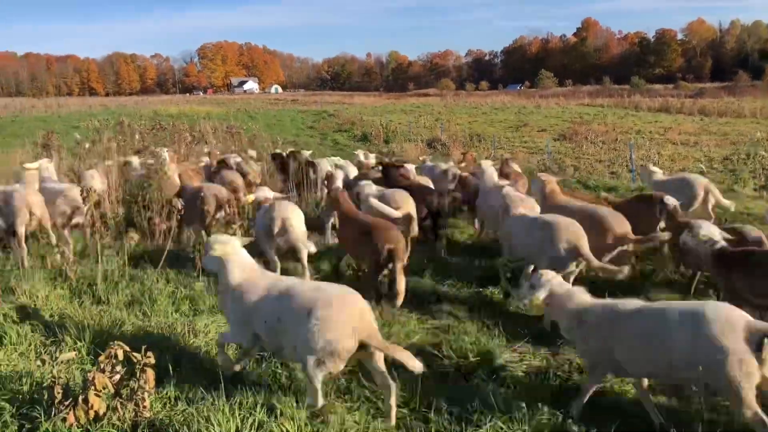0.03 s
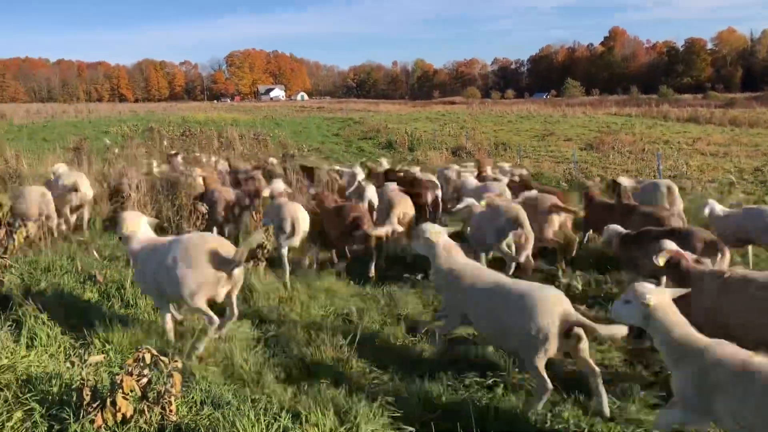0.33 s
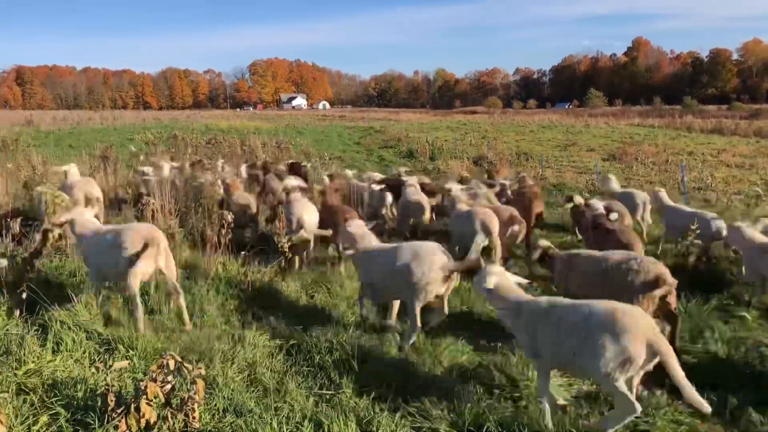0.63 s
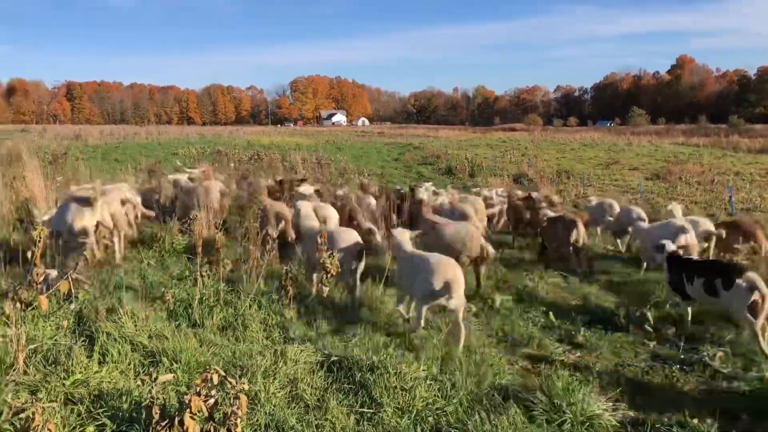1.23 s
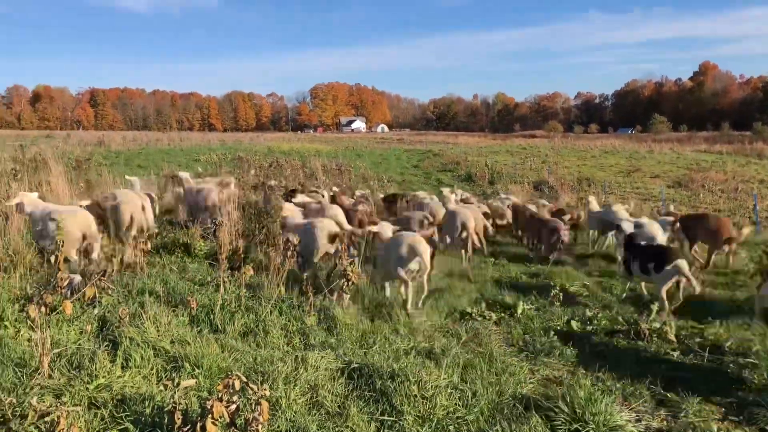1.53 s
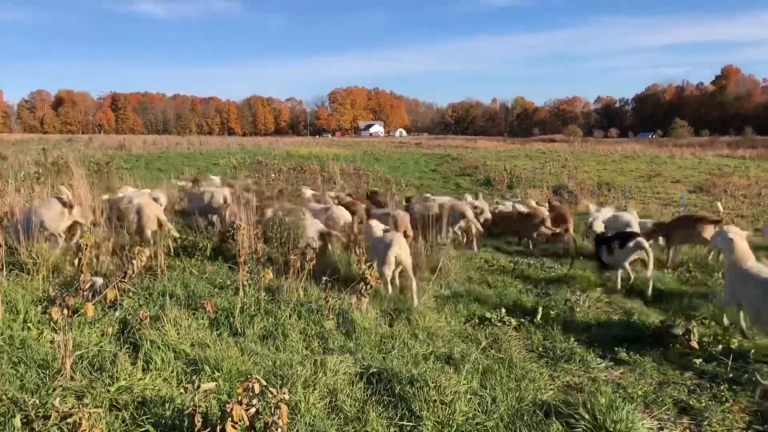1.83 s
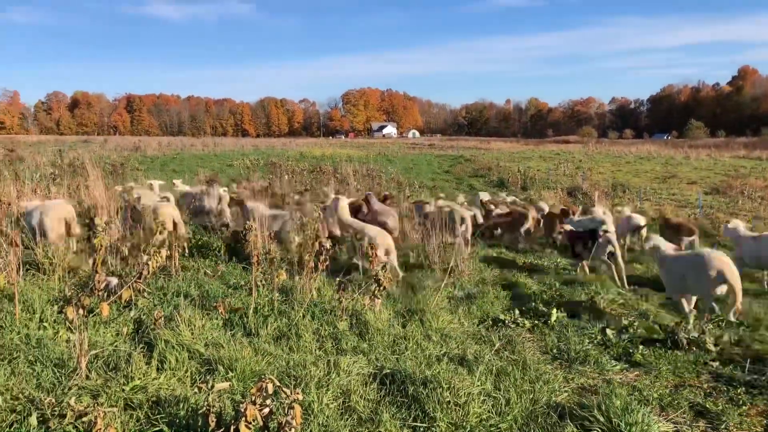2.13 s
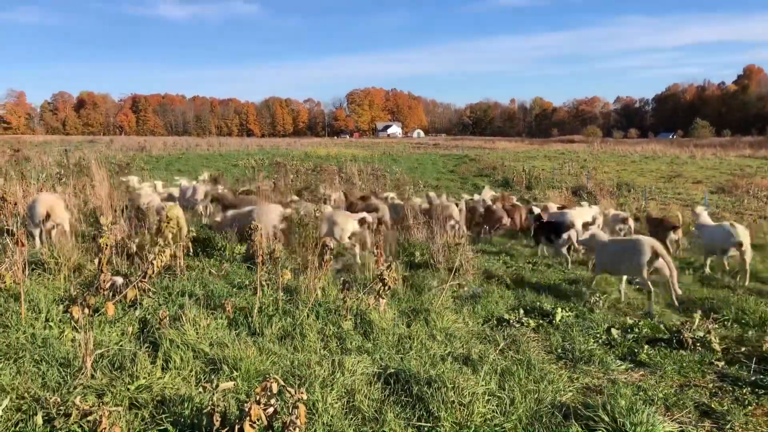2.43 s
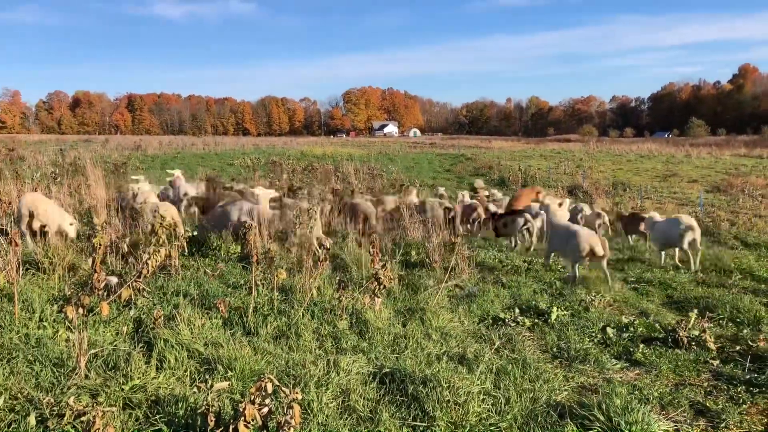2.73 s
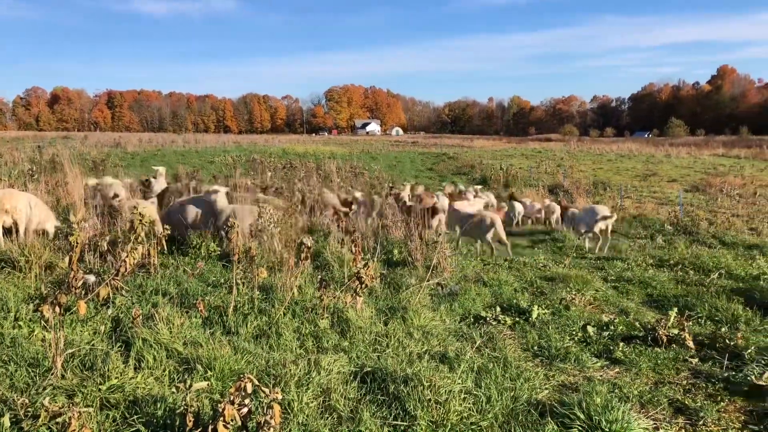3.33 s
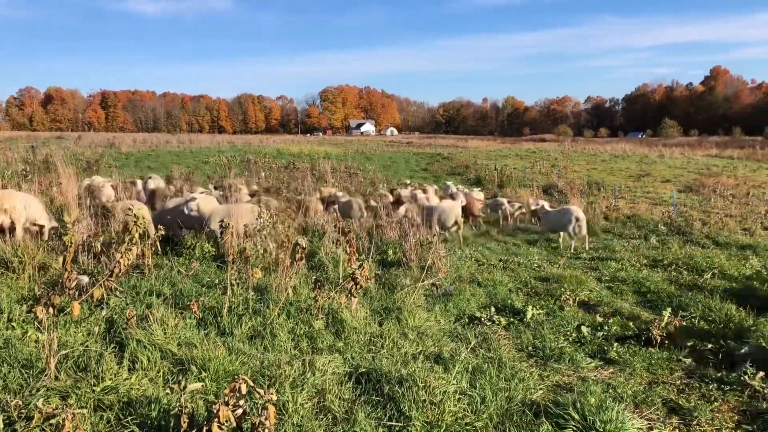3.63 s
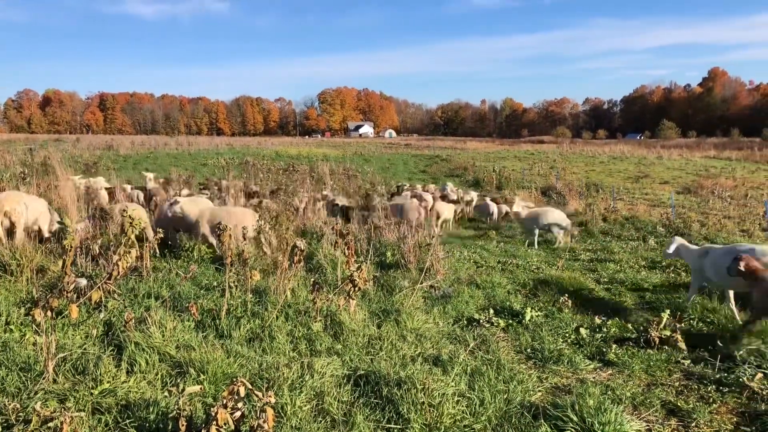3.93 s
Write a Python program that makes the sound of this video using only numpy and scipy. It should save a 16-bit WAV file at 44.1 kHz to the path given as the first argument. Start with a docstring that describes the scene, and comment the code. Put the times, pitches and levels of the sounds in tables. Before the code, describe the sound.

A flock of sheep trots away through grass, its crackling rustle loudest in the first second and fading through 4 seconds. Legs swish through nearby tufts and dry stalks snap, mostly from 0.5 to 2.8 seconds and again around 3.5. Low wind puffs buffet and pop on the microphone, strongest just after 3 seconds. A soft rumble of hooves and a faint hush of open air lie underneath.

```python
"""A flock of sheep trots away through grass and dry weeds, heard on one microphone in open pasture.
Countless blades crackle under the flock, fainter and duller with distance.
Closer in, legs swish through tufts, dry stalks snap and a hoof knocks twice.
Puffs of wind buffet and pop on the microphone; behind it all, a soft rumble of hooves on turf
and the hush of the air."""
import sys
import numpy as np
from scipy import signal
from scipy.fft import rfft, irfft
from scipy.io import wavfile
from scipy.ndimage import uniform_filter1d

SR = 44100
rng = np.random.default_rng(int(sys.argv[2]) if len(sys.argv) > 2 else 0)


def unload_audio(sound):
    """Save the sound as a 16-bit wav file, at the path given as the first command line argument."""
    columns = np.transpose(np.atleast_2d(sound))
    # keep every value between -1 and 1, then stretch to whole-number steps
    steps = np.round(np.clip(columns, -1, 1) * 32767)
    wavfile.write(sys.argv[1], SR, steps.astype(np.int16))


N = 176400
T = np.arange(N) / SR
HZ = np.fft.rfftfreq(N, 1 / SR)

# rustle of the receding flock at the microphone: t/s, level/dB
FLOCK_LEVEL = [(0, -38.5), (.25, -37), (.44, -39), (.53, -35.5), (.64, -40), (.85, -38), (.97, -38),
               (1.04, -39), (1.33, -40.5), (1.5, -39), (1.9, -40.5), (2.08, -40), (2.24, -43.5),
               (2.55, -43), (2.72, -46.5), (3.05, -45), (3.25, -46.5), (3.41, -50), (3.6, -47), (4, -47.5)]
# spectrum of the grass under the flock: f/Hz, relative level/dB
GRASS_SPECTRUM = [(150, 4), (450, -4.5), (750, 0), (1130, -4), (1380, 0.5), (1850, -2), (3000, 1.7),
                  (4600, 2.5), (8000, 2), (12500, 2), (15500, 5)]
# legs through near tufts: peak t/s, rise/s, fall/s, level/dB, share of fine blades/0-1
LEG_SWISHES = [(.135, 0.034, 0.012, -38, 0.95), (.225, 0.016, .018, -37, 0.94),
               (.694, 0.02, 0.03, -38, 0.9), (.767, 0.0033, 0.006, -33.5, 0.4),
               (.791, .0094, 0.033, -34.5, 0.73), (.861, 0.0089, 0.012, -36, 0.6),
               (0.918, 0.0067, 0.011, -36.5, 0.66), (1.157, 0.0053, 0.029, -38.5, 0.5),
               (1.26, 0.0016, .005, -38, 1), (1.429, 0.013, 0.0088, -33.5, 0.62),
               (1.446, 0.0052, 0.0075, -38.5, 0.37), (1.49, 0.043, .014, -47, .9),
               (1.632, .006, 0.02, -53, 0.9), (1.915, .0055, 0.026, -47.5, .1),
               (2.025, 0.01, 0.077, -41, 0.67), (2.14, .018, .018, -44.5, 0.65),
               (2.422, 0.041, 0.057, -43, 0.53), (2.64, 0.013, 0.022, -47, 0.9),
               (3.255, .035, 0.061, -48.5, 0.7), (3.326, 0.022, .015, -39, .76),
               (3.465, 0.005, .03, -39.5, 0.6), (3.491, 0.013, 0.046, -39, .7)]
# spectrum of a tuft's coarse stems: f/Hz, relative level/dB
STEM_SPECTRUM = [(200, -24), (600, 2), (1000, 2), (1450, 5), (2300, 6), (4200, 10.5), (6500, 9.5),
                 (10000, -21), (15500, -14)]
# spectrum of a tuft's fine blades: f/Hz, relative level/dB
BLADE_SPECTRUM = [(300, -1), (2000, -13.5), (4000, -5.5), (6500, 1), (11000, 3.5), (15500, 1.5)]
# dry stalks cracking, and two lower hoof knocks (2.432 and 3.474 s): t/s, level/dB, centre f/Hz
SNAPS_AND_KNOCKS = [(.5058, -33, 10000), (0.688, -40, 2800), (.769, -39, 2200), (.788, -33, 5000),
                    (.909, -35, 4000), (1.158, -32.5, 5500), (1.258, -32, 5650), (1.2598, -30, 8500),
                    (1.428, -35, 4200), (1.444, -30, 3500), (1.511, -26.5, 12000), (1.6309, -29, 12000),
                    (1.6896, -34.5, 6450), (1.911, -36.5, 3900), (1.9316, -42, 7500), (2.14, -36, 3950),
                    (2.4166, -33.5, 4140), (2.432, -45.5, 1260), (2.456, -34, 10200), (2.6328, -33, 6160),
                    (2.6585, -35, 10000), (2.771, -38, 6500), (2.778, -38, 5300), (3.302, -38, 4430),
                    (3.375, -38, 6800), (3.46, -34.5, 6050), (3.474, -40, 2000), (3.4885, -27.5, 6470),
                    (3.55, -35.5, 11300)]
# wind on the microphone: peak t/s, rise/s, fall/s, level/dB, upper edge f/Hz
WIND_PUFFS = [(0.029, 0.035, 0.015, -36.5, 318), (0.152, 0.0076, 0.014, -32, 290),
              (.223, 0.016, 0.023, -35, 218), (1.494, 0.014, 0.029, -32, 165),
              (1.596, 0.026, 0.026, -32.5, 266), (1.735, 0.027, 0.0099, -29, 191),
              (1.788, 0.016, 0.013, -26, 240), (2.051, 0.0067, 0.016, -34.5, 222),
              (2.089, 0.0068, .018, -29.5, 385), (2.154, 0.042, 0.06, -32.5, 135),
              (2.43, 0.033, 0.033, -38, 128), (2.595, 0.013, 0.023, -31.5, 352),
              (2.686, 0.026, 0.015, -28.5, 208), (2.816, 0.0056, 0.04, -26, 147),
              (2.996, 0.033, 0.029, -31.5, 228), (3.035, 0.022, 0.021, -27, 231),
              (3.113, 0.015, 0.01, -19, 190), (3.135, 0.067, 0.018, -35.5, 362),
              (3.162, 0.011, 0.026, -24.5, 185), (3.205, 0.0062, 0.021, -28, 330),
              (3.283, 0.022, 0.029, -27.5, 207), (3.403, 0.018, 0.029, -35.5, 177),
              (3.59, 0.049, 0.04, -35.5, 152), (3.788, 0.037, 0.025, -32, 167),
              (3.826, 0.015, 0.025, -31.5, 126), (3.914, 0.0037, 0.045, -30.5, 212),
              (3.944, 0.011, 0.0082, -24.5, 223)]
# tight vortices at the microphone port: t/s, peak level/dB, width/s
VORTEX_POPS = [(0.151, -33, 0.0021), (1.578, -26.5, 0.0017), (1.782, -21, 0.0028), (2.993, -35.5, 0.0018),
               (3.108, -17, 0.0026), (3.189, -17.5, 0.0022), (3.298, -26.5, 0.0026)]
# spectrum of hooves on turf and distant rumble: f/Hz, relative level/dB
TURF_SPECTRUM = [(20, -33), (32, -23), (50, -2.5), (75, 2), (105, -8), (170, -9.5), (280, -19.5),
                 (450, -32), (1000, -35), (3000, -90)]
# spectrum of the air over the pasture: f/Hz, relative level/dB
AIR_SPECTRUM = [(30, 0), (300, 2.5), (450, -3.5), (680, 3), (1000, -2), (1450, 2), (1900, -0.5), (3700, 5),
                (5200, 2), (8000, -1.5), (15500, 1.5)]


def flock_rustle(tips_above_hz=7000, dull_above_hz=8500, dull_db_per_s=-1):
    """Stems and dry tips crackle under the flock, fainter and duller as it leaves the microphone."""
    stride_flutter = amp(1.1 * wander(up_to_hz=45.7))
    stem_share = 1 / (1 + (HZ / tips_above_hz) ** 2)
    stems = rfft(crackle(per_s=3000, spread_db=3, hiss=0.73)) * np.sqrt(stem_share)
    tips = rfft(crackle(per_s=3000, spread_db=1.5, hiss=0.53)) * np.sqrt(1 - stem_share)
    grass = colour(irfft(stems + tips, N) * stride_flutter, GRASS_SPECTRUM)
    body = irfft(rfft(grass) / (1 + (HZ / dull_above_hz) ** 4), N)
    treble = (grass - body) * amp(dull_db_per_s * T)
    return (body + treble) * amp(np.interp(T, *np.transpose(FLOCK_LEVEL)))


def leg_swishes():
    """Near the microphone, each leg sweeps a tuft of coarse stems and fine blades."""
    stem_power, blade_power, out = np.zeros((3, N))
    for at, rise, fall, db, fine_share in LEG_SWISHES:
        power = (amp(db) * swell(T - at, rise, fall)) ** 2
        stem_power += (1 - fine_share) * power
        blade_power += fine_share * power
    for power, spectrum in [(stem_power, STEM_SPECTRUM), (blade_power, BLADE_SPECTRUM)]:
        out += colour(np.sqrt(power) * crackle(per_s=3500, spread_db=4.5, hiss=0.81), spectrum)
    return out


def snaps_and_knocks(decay_cycles=10.4, edge_ratio=1.55, size=2048):
    """Close by, dry stalks crack as their fibres tear at once; two hoof knocks are lower and longer."""
    out, t = np.zeros(N), np.arange(size) / SR
    for at, db, hz in SNAPS_AND_KNOCKS:
        band = signal.butter(2, [hz / edge_ratio, hz * edge_ratio], "band", fs=SR, output="sos")
        decay = np.exp(-t * hz / decay_cycles)
        burst = signal.sosfilt(band, decay * rng.choice([-1., 1.], size))
        start = round(at * SR)
        out[start:start + size] += amp(db) * unit(burst) * np.sqrt(np.mean(decay ** 2))
    return out


def wind_puffs(low_hz=62.3, fast_above_hz=190, fast_decay=2.65, even_s=0.014, size=32768):
    """Eddies hit the microphone as short low buffets; the small fast ones die out first."""
    out, hz = np.zeros(N + size), np.fft.rfftfreq(size, 1 / SR)
    t = (np.arange(size) - size // 2) / SR
    slow_share = 1 / (1 + (hz / fast_above_hz) ** 6)
    low_hump = (hz / low_hz) ** 3 / np.sqrt(1 + (hz / low_hz) ** 8)
    for at, rise, fall, db, edge_hz in WIND_PUFFS:
        band = low_hump / np.sqrt(1 + (hz / edge_hz) ** 9.7)
        band /= np.linalg.norm(band)
        start = round(at * SR)
        for share, decay in [(slow_share, 1), (1 - slow_share, fast_decay)]:
            part = band * np.sqrt(share)
            eddy = np.fft.ifft(rfft(rng.standard_normal(size)) * part, size)
            # even out the noise so that the envelope shapes the puff
            running_rms = np.sqrt(uniform_filter1d(abs(eddy) ** 2, int(even_s * SR)) / 2)
            envelope = amp(db) * np.linalg.norm(part) * swell(t, rise, fall) ** decay
            out[start:start + size] += envelope * eddy.real / running_rms
    return out[size // 2:][:N]


def vortex_pops():
    """A tight vortex crosses the microphone port: a sharp dip in pressure, a rebound on each side."""
    out = np.zeros(N)
    for at, db, width in VORTEX_POPS:
        u = (T - at) / width
        out -= amp(db) * (1 - 3 * u * u) / (1 + u * u) ** 3
    return out


def hoof_rumble(level_db=-48.5, swell_db=2.14):
    """Many soft hoofbeats on the turf merge into a low rumble."""
    gain = amp(level_db + swell_db * wander(up_to_hz=7.5))
    return gain * unit(colour(rng.standard_normal(N), TURF_SPECTRUM))


def pasture_air(level_db=-54.5):
    """Still air over the pasture, a steady hush in the background."""
    return amp(level_db) * colour(rng.standard_normal(N), AIR_SPECTRUM)


def crackle(per_s, spread_db, hiss, decay_s=0.00048, kinds=16):
    """Blades flick past each other, each a tiny dying burst, over the hiss of their sliding."""
    t = np.arange(96) / SR
    spectra = rfft(rng.standard_normal((kinds, len(t))) * np.exp(-t / decay_s), 256)
    bursts = irfft(spectra / np.sqrt(np.mean(abs(spectra) ** 2, axis=0)))  # white on average
    sizes = amp(spread_db * np.minimum(rng.exponential(1, N), 5))  # many small, a few large
    clicks = sizes * rng.choice([-1., 1.], N) * (rng.random(N) < per_s / SR)
    kind = rng.integers(0, kinds, N)
    flicks = sum(signal.oaconvolve(clicks * (kind == k), bursts[k])[:N] for k in range(kinds))
    return unit(unit(flicks) + hiss * rng.standard_normal(N))


def amp(db):
    """Decibels to gain."""
    return 10 ** (np.asarray(db) / 20)


def unit(x):
    """Scales to rms 1."""
    return x / np.sqrt(np.mean(x ** 2) + 1e-20)


def colour(x, spectrum):
    """Filters by a spectrum, keeping the power of white input."""
    f, db = np.transpose(spectrum)
    gain = amp(np.interp(np.log(HZ + 1), np.log(f), db))
    return irfft(rfft(x) * unit(gain), N)


def wander(up_to_hz):
    """Random drift of rms 1."""
    pink = rfft(rng.standard_normal(N)) * (HZ > 2) / np.sqrt(HZ + 2)
    return unit(irfft(pink / (1 + (HZ / up_to_hz) ** 4), N))


def swell(t, rise, fall):
    """Smooth rise to a peak at t = 0, then exponential fall."""
    return np.exp(-(np.minimum(t, 0) / rise) ** 2 - np.maximum(t, 0) / fall)


def scene():
    """The pasture at one microphone, the same in both channels."""
    air = pasture_air()
    sheep = flock_rustle() + leg_swishes() + snaps_and_knocks()
    mono = sheep + wind_puffs() + vortex_pops() + hoof_rumble() + air
    return np.array([mono, mono])


def record(dry, low_cut_hz=39, top_hz=15800):
    """The recorder's low cut and band limit."""
    low_cut = signal.butter(3, low_cut_hz, "high", fs=SR, output="sos")
    band_limit = signal.firwin(1201, top_hz, window=("kaiser", 9), fs=SR)
    return signal.oaconvolve(signal.sosfilt(low_cut, dry), band_limit[None], "same")


dry = scene()
out = record(dry)
unload_audio(out)
```